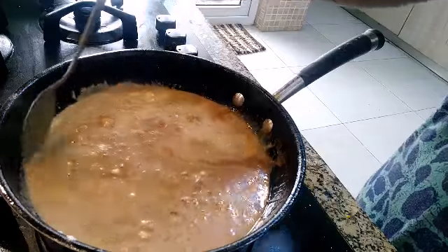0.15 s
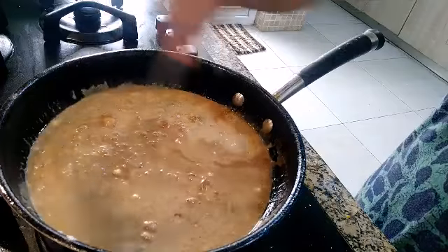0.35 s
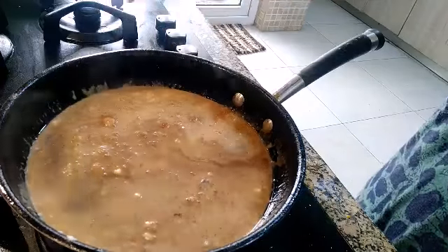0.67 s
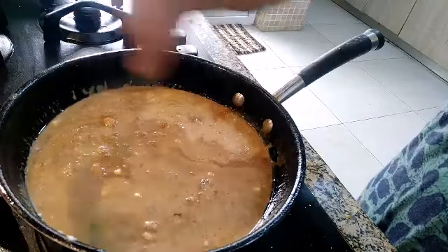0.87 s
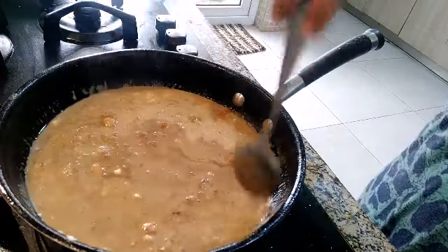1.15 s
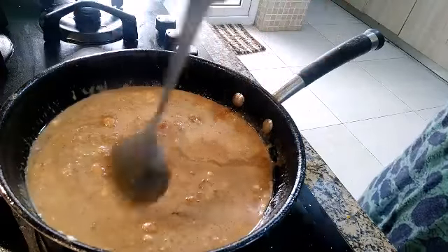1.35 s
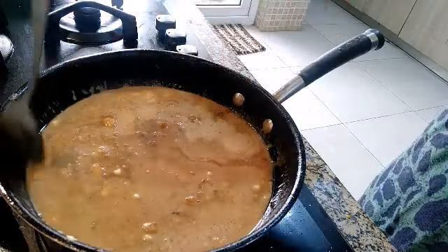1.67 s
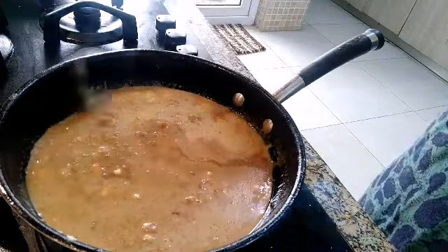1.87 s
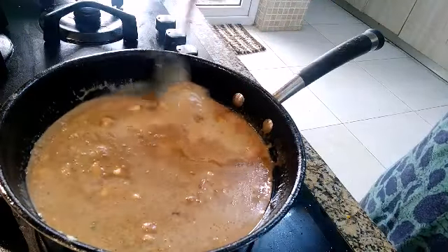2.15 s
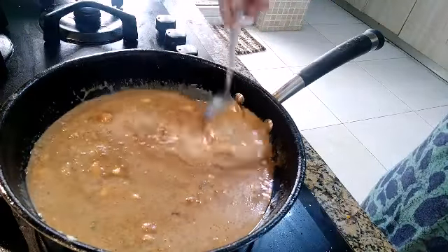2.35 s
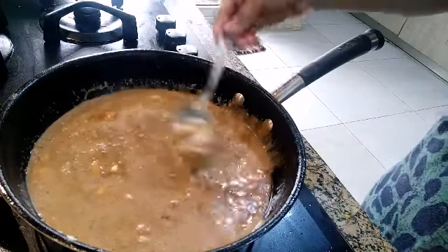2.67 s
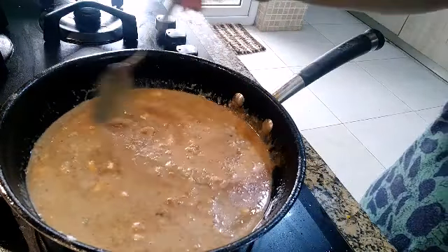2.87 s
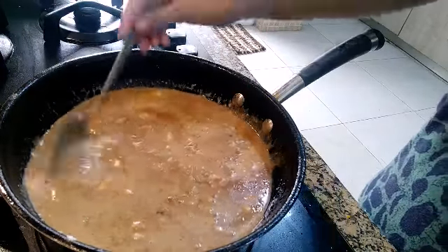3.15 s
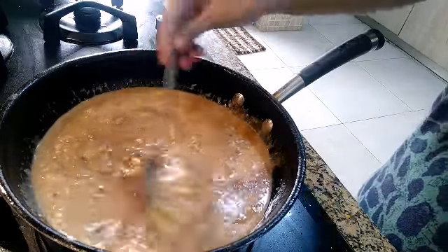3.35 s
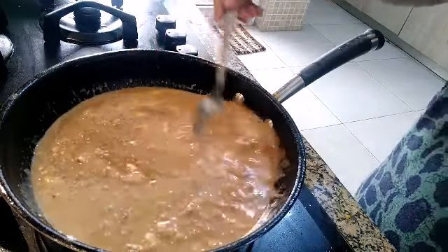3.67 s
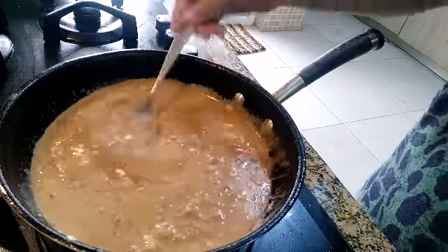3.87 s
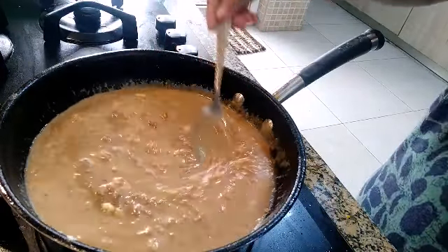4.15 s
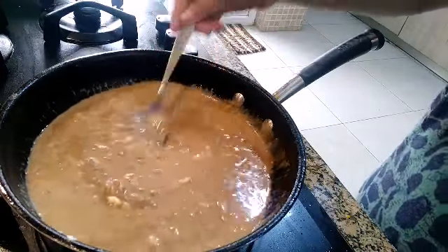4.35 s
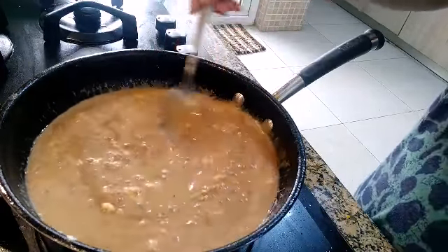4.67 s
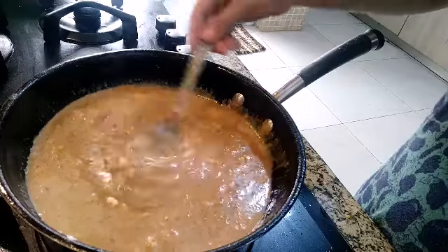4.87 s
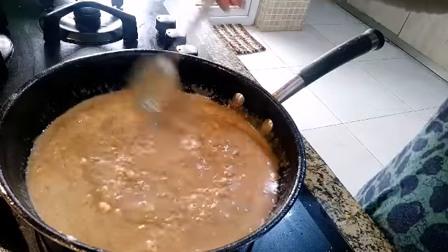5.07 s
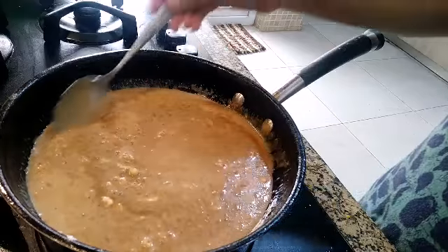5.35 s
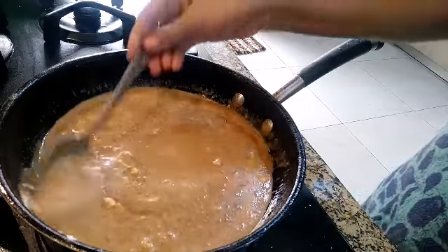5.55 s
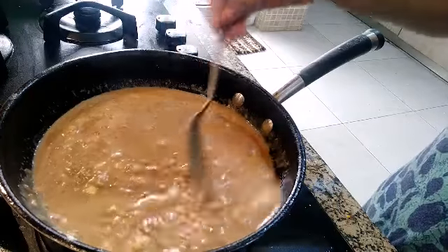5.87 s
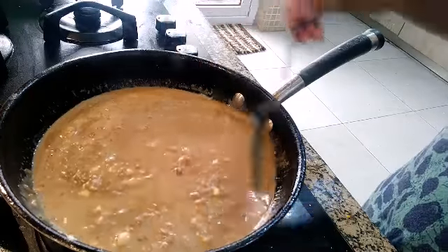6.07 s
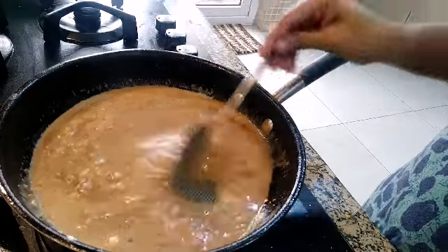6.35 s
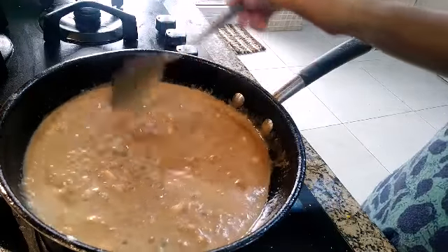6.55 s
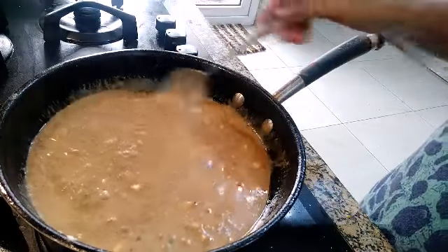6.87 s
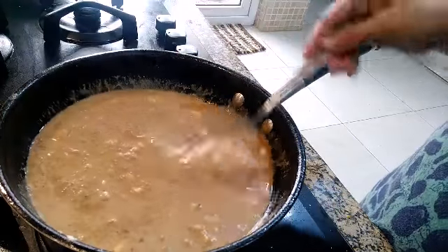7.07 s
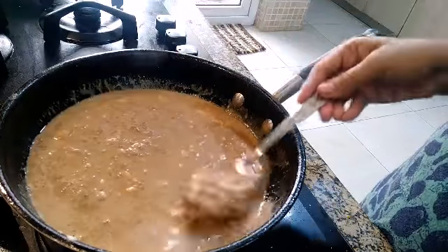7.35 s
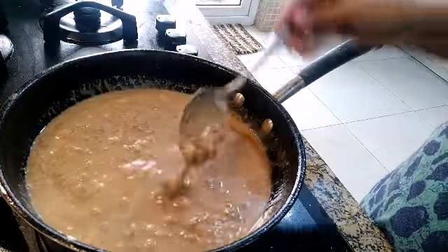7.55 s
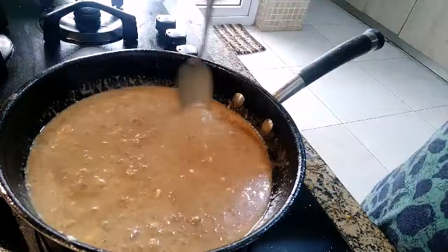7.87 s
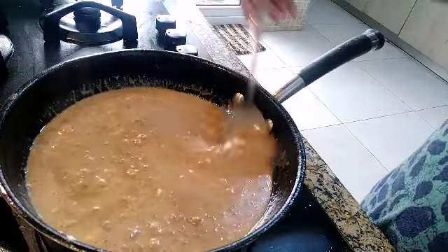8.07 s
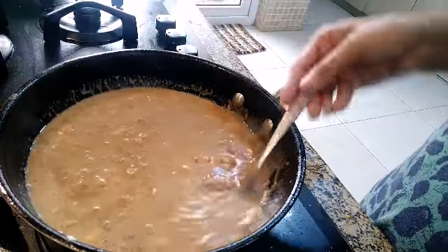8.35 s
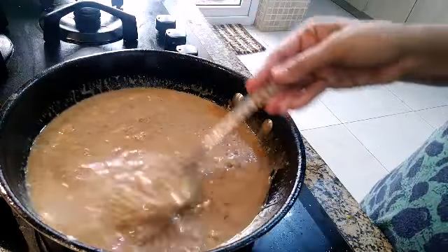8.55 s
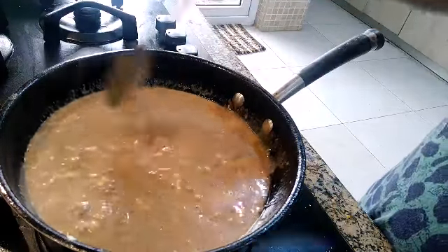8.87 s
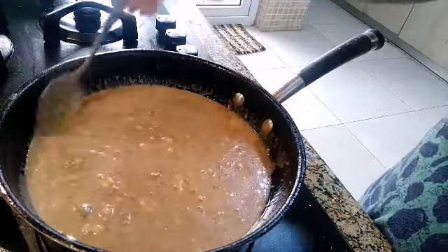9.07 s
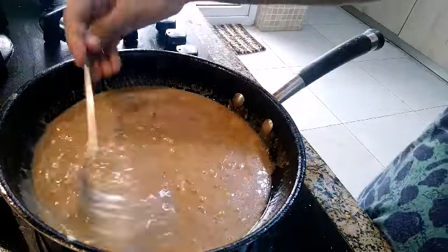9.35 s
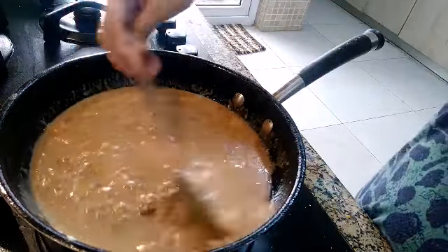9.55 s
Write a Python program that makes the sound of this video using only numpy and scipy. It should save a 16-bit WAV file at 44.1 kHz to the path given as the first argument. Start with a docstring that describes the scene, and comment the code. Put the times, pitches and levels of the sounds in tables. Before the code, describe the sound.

Heard close to the stove in a tiled kitchen, thick sauce sloshes and fizzes as a metal spoon circles a frying pan. The stirring turns into uneven scrapes along the bottom that make the pan ring and the sauce hiss. Scattered clanks and small bubble pops come between the strokes, with two sharper knocks late on, over a steady low hum and a soft gas flame.

```python
"""A steel spoon sweeps thick sauce round the wall of a hot frying pan, and the wet sauce sizzles.
Then it scrapes the bottom in short strokes, its edge catching and slipping so that pan and spoon ring.
Now and then it knocks the pan, or a bubble pops. Underneath lie the gas burner's low rush and a hum.
The place is a tiled kitchen, with a stereo microphone close to the pan on the hob."""
import sys
import numpy as np
from scipy import signal
from scipy.fft import rfft, irfft, next_fast_len
from scipy.io import wavfile
from scipy.ndimage import map_coordinates

SR = 44100
rng = np.random.default_rng(int(sys.argv[2]) if len(sys.argv) > 2 else 0)


def digitize_waveform(pressure):
    """Quantize a signal to 16-bit integers and store it at the path in sys.argv[1].

    Rows of a 2-D input are taken as channels; values are limited to [-1, 1].
    """
    field = np.atleast_2d(pressure).T
    bounded = np.clip(field, -1, 1)
    quanta = np.round(bounded * 32767).astype(np.int16)
    wavfile.write(sys.argv[1], SR, quanta)


N = 428211

# Strokes round the wall: start_s, pressing_s, easing_s, pan_db, grit_db, sizzle_db, slosh_db, centre_hz
SWEEPS = [(.134, 0.0092, 0.23, -48, -60.5, -67, -54.5, 810), (.31, 0.081, 0.15, -41, -60, -40, -40.5, 494),
          (.86, 0.075, 0.074, -44.5, -60.5, -39.5, -47, 447),
          (.94, 0.025, 0.22, -41, -71, -43.5, -39.5, 484), (1.645, 0.078, 0.12, -36, -49.5, -40, -45, 540),
          (1.82, 0.078, .14, -37, -51.5, -46.5, -46, 620), (1.98, 0.1, 0.24, -36.5, -47.5, -45.5, -41, 740),
          (2.17, 0.057, 0.23, -47, -48.5, -43.5, -64, 870)]
# Strokes on the bottom: start_s, pressing_s, easing_s, pan_db, grit_db, sizzle_db, hollow_db, centre_hz
SCRAPES = [(3.054, .37, .11, -49.5, -44, -44, -45, 766),
           (3.854, 0.0055, 0.21, -48, -52.5, -54.5, -54.5, 916),
           (3.94, 0.091, 0.037, -48, -54, -59, -46.5, 760), (4.3, 0.05, 0.39, -51, -60.5, -59, -50.5, 1255),
           (4.585, 0.049, 0.17, -48, -50.5, -48, -45, 1219),
           (4.76, 0.03, 0.21, -45.5, -53.5, -49, -50, 1250),
           (5.495, 0.12, 0.16, -49.5, -48, -49.5, -50.5, 601), (6.20, 0.03, 0.1, -48, -58, -68, -53, 986),
           (6.305, 0.076, 0.088, -36, -41.5, -44.5, -50, 1130),
           (6.82, 0.22, 0.2, -42, -45, -45.5, -44.5, 943), (7.925, 0.18, .06, -69, -43, -44, -49.5, 1202),
           (8.12, 0.032, 0.26, -42, -46.5, -48, -66, 700), (9.151, 0.11, 0.29, -44, -48, -50, -46, 610),
           (9.44, 0.19, 0.28, -50.5, -54.5, -52, -60, 640)]
# A sweep glides in through the sauce, a scrape lands at once: touch_s, swell_db, focus_db_per_octave
SWEEP_MANNER = (0.016, 13, 14.4)
SCRAPE_MANNER = (0.003, 10, 12)
# The hollow ring changes as the spoon's bowl tilts and travels: time_s, pitch_hz
HOLLOW_PITCH = [(3.099, 715), (3.401, 772), (3.998, 720.6), (4.351, 1075), (4.46, 767.2), (4.77, 770),
                (4.81, 1078), (4.871, 750), (5.601, 650), (6.38, 900), (6.902, 723), (7.299, 784),
                (8.061, 952), (9.3, 727.4), (9.39, 645)]
# Fine sizzle, highest while sauce swept up the wall dries: time_s, level_db
SIMMER = [(0, -61), (.5, -54.5), (.8, -52), (1.2, -65), (1.55, -57.5), (1.8, -53), (2.45, -50.5),
          (3.02, -57), (3.75, -65.5), (5.3, -68.5), (6.7, -70.5), (7.5, -65), (8.6, -72), (9.7, -71)]
# The spoon hits the pan: start_s, crack_db, spoon_db, pan_db, thump_db, centre_hz
KNOCKS = [(0.806, -38, -46, -38.5, -35.5, 776), (2.391, -75, -82, -39.5, -53, 438),
          (3.058, -44.5, -45, -37.5, -76, 1860), (3.3182, -41, -48, -39, -45, 483),
          (3.4303, -51, -30, -70, -66, 1800), (5.4958, -40.5, -43, -47.5, -52, 650),
          (6.1987, -35.5, -40, -33, -35.5, 990), (6.241, -48, -40, -40.5, -43, 1080),
          (7.265, -68, -54, -40, -49, 363), (7.9249, -31.5, -28, -32, -37.5, 1080),
          (8.1135, -26, -25, -31.5, -39.5, 610)]
# Bubbles burst: start_s, level_db
POPS = [(5.129, -45), (5.385, -45.5), (7.323, -44), (7.629, -41), (7.797, -49)]
# Resonances of the metal: pitch_hz, width_hz, level_db
PAN_MODES = [(290.6, 13, 2.5), (347, 26, 5), (404, 16, 0), (549, 14, -1.5), (635.3, 25, 8),
             (723.5, 23.5, 5.5), (953, 50, 4.5), (1068.6, 27, 7), (1164, 36, 3.5), (1326, 170, 12),
             (1829, 66, 9)]
SPOON_MODES = [(1790, 98, -13.5), (2786, 82, -0.5), (3095, 83, -1), (4640, 28, -8), (5080, 35, -33)]
# Spectral shapes: frequency_hz, level_db
RUB_SPECTRUM = [(180, -32), (340, 25), (510, 13.5), (680, 22.5), (1550, 13.5), (2400, -38)]  # the rubbed body of the pan
GRIT_SPECTRUM = [(900, -33), (1500, 9), (3000, 15.5), (5200, 6.5), (7500, -10), (9300, -9), (16000, -18)]  # the spoon's edge on the metal
SIZZLE_SPECTRUM = [(2000, -21.5), (4000, -1), (5100, 5), (6300, -1), (7900, -3), (9300, -24.5),
                   (11000, -9.5), (13600, -1.5), (16000, -6)]  # boiling sauce
DRYING_TILT = [(6000, -1), (13000, 5.5)]  # a drying film fizzes more finely
CRACK_SPECTRUM = [(300, 0.5), (1200, 19), (2800, 13), (5400, 14.5), (9300, 4), (13500, 12.5), (16000, 1)]  # the onset of a knock or pop
BURNER_SPECTRUM = [(28, 3.5), (45, -8.5), (160, -2.5), (220, -9), (700, -19.5), (1050, -22), (1600, -39),
                   (15500, -125)]  # the gas flame
# Tones of the hum in the room: pitch_hz, level_db
HUM_TONES = [(48, -58.5), (98, -59.5), (174.5, -52.5)]
# Reverberation of the tiled kitchen: frequency_hz, t60_s
KITCHEN_DECAY = [(150, 0.75), (3000, 0.75), (14000, 0.37)]
# Likeness of left and right at the microphone: frequency_hz, correlation
STEREO_LIKENESS = [(150, 0.97), (300, 0.87), (700, 0.3), (3000, 0.0091)]
# Balance of the microphone's two ports: frequency_hz, left_over_right_db
PORT_BALANCE = [(200, -0.25), (380, -6.5), (700, 1.5), (4400, -1), (8500, -14), (12000, 4.5), (15000, 25.5)]

EASE_DB, SWELL_SHAPE = 12, 1.18  # drop as the hand eases off; a shape over 1 rounds the swell
PAN_FADE_DB_PER_S, GRIT_FADE_DB_PER_S, SIZZLE_FADE_DB_PER_S = 89, 84, 118.5  # once the spoon lets go
GULP_HZ, GULP_S, GULP_RISE = 330.3, 0.065, 0.17  # typical pitch, life, fractional rise over that life
HOLLOW_WIDTH_HZ = 48
LOW_CUT_HZ, TOP_HZ = 36, 15850


def strokes():
    """The spoon's edge catches and slips, shaking the metal, pushing sauce and smearing it to a boil."""
    pan_gain, grit_gain, sizzle_gain, slosh_gain, hollow_gain, *mode_gains = stroke_gains()
    # fast catches ride on the slower, uneven pressure of the hand
    slips = amp(2.4 * wobble(350) + 2.2 * np.tanh(wobble(35)))
    snags = amp(-4) * grains(rate=130, spread_db=1)
    metal = pan_gain * pan_body(slips, snags, mode_gains) + grit_gain * spoon_edge(slips, snags)
    boil = sizzle(sizzle_gain)
    return metal + slosh_gain * slosh() + hollow_gain * hollow_ring() + amp(5.5) * boil


def stroke_gains():
    """Gain curves of pan, grit, sizzle, slosh and hollow ring, then of each pan mode."""
    t = np.arange(0, N / SR, .001)
    pan, grit, boil, push, press = np.zeros((5, len(t)))  # overlapping strokes add in power
    spots = []
    for table, manner, bowl in (SWEEPS, SWEEP_MANNER, push), (SCRAPES, SCRAPE_MANNER, press):
        touch_s, swell_db, focus = manner
        for start_s, pressing_s, easing_s, pan_db, grit_db, sizzle_db, bowl_db, centre_hz in table:
            shape = np.maximum(t - start_s, 0), pressing_s, easing_s, touch_s, swell_db
            pan += (amp(pan_db) * pressure(*shape, PAN_FADE_DB_PER_S)) ** 2
            bowl += (amp(bowl_db) * pressure(*shape, PAN_FADE_DB_PER_S)) ** 2
            grit += (amp(grit_db) * pressure(*shape, GRIT_FADE_DB_PER_S)) ** 2
            boil += (amp(sizzle_db) * pressure(*shape, SIZZLE_FADE_DB_PER_S)) ** 2
            spots.append((start_s + pressing_s, centre_hz, focus))
    peaks_s, centres_hz, focuses = np.transpose(spots)
    mode_gains = favoured_modes(np.interp(t, peaks_s, centres_hz), np.interp(t, peaks_s, focuses))
    curves = [*np.sqrt([pan, grit, boil, push, press]), *mode_gains]
    return [np.interp(np.arange(N) / SR, t, curve) for curve in curves]


def pressure(t, pressing_s, easing_s, touch_s, swell_db, fade_db_per_s):
    """Gain of one stroke: the spoon takes hold, presses harder, eases off and lets go."""
    swell = swell_db * np.maximum(1 - t / pressing_s, 0) ** SWELL_SHAPE
    ease = EASE_DB * np.clip((t - pressing_s) / easing_s, 0, 1) ** 2
    release = fade_db_per_s * np.maximum(t - pressing_s - easing_s, 0)
    return np.minimum(t / touch_s, 1) * amp(-swell - ease - release)


def pan_body(slips, snags, mode_gains):
    """Friction and the jolts of the snagging edge ring the pan's modes over a broad rubbing noise."""
    shake = noise() * slips + snags
    ring = sum((-1) ** k * mode_gains[k] * resonated(shake, [mode]) for k, mode in enumerate(PAN_MODES))
    rub = coloured(noise() * slips, RUB_SPECTRUM)
    rub = shifting_modes(rub, spacing_hz=90, rate=12, depth_db=15, glide_hz=40)
    return ring + amp(-8) * rub


def spoon_edge(slips, snags):
    """Snags make the rubbing gritty, while friction rings the spoon faintly."""
    grit = coloured(noise() * slips + .5 * snags, GRIT_SPECTRUM)
    edge = amp(3.5) * grit + amp(-16) * resonated(noise() * slips, SPOON_MODES)
    edge = shifting_modes(edge, spacing_hz=100, rate=15, depth_db=13, glide_hz=70)
    edge = shifting_modes(edge, spacing_hz=330, rate=15, depth_db=4, glide_hz=200)
    flutter = unit(amp(3 * np.tanh(wobble(110))))
    return edge * flutter


def favoured_modes(centre_hz, focus_db_per_octave):
    """Gain of each pan mode: the spot that is touched favours those near one pitch."""
    gains = np.array([amp(db - focus_db_per_octave * abs(np.log2(hz / centre_hz)))
                      for hz, _, db in PAN_MODES])
    return gains / np.linalg.norm(gains, axis=0)


def shifting_modes(x, spacing_hz, rate, depth_db, glide_hz):
    """As the contact point travels, the pan's close-set modes take turns and their pattern slides."""
    hz, t, spectra = signal.stft(x, SR, nperseg=2048)
    slide_hz = glide_hz * np.interp(t * SR, np.arange(N), wobble(3))
    where = np.broadcast_arrays((hz[:, None] + slide_hz) / spacing_hz, t * rate)
    pattern = map_coordinates(rng.standard_normal((512, 256)), where, order=2, mode="mirror")
    gain = amp(depth_db * np.tanh(pattern) / (1 + hz[:, None] / 12000))
    gain /= np.sqrt(np.mean(gain ** 2, axis=1, keepdims=True))
    return signal.istft(spectra * gain, SR, nperseg=2048)[1][:, :N]


def hollow_ring():
    """The spoon's bowl, pressed on the bottom, keeps one resonance singing, then hops to another."""
    times_s, pitches_hz = np.transpose(HOLLOW_PITCH)
    nearest = np.searchsorted((times_s[1:] + times_s[:-1]) / 2, np.arange(N) / SR)
    hz = pitches_hz[nearest] * (1 + .03 * wobble(16))
    drive = filtered(rng.standard_normal((2, 2, N)), lambda f: 1 / (1 + (f / HOLLOW_WIDTH_HZ) ** 2))
    drive /= np.sqrt(np.hypot(*drive))  # keep the hollow ring's loudness even
    phase = 2 * np.pi * np.cumsum(hz) / SR
    mid, side = drive[0] * np.cos(phase) + drive[1] * np.sin(phase)
    return unit(mid + amp(-7) * np.array([side, -side]))


def sizzle(stroke_gain):
    """Freshly smeared sauce sizzles with each stroke; the drying film fizzes on in between."""
    fresh = boiling(rate=2900, hiss_db=-1)
    fresh = shifting_modes(fresh, spacing_hz=170, rate=13, depth_db=12, glide_hz=90)
    drying = coloured(boiling(rate=1500, hiss_db=-3), DRYING_TILT)
    simmer_gain = amp(np.interp(np.arange(N) / SR, *np.transpose(SIMMER)))
    return stroke_gain * fresh + simmer_gain * drying


def boiling(rate, hiss_db):
    """Sauce on hot metal boils in a mass of minute bubbles."""
    bubbles = grains(rate, spread_db=1.3) + amp(hiss_db) * noise()
    return coloured(bubbles, SIZZLE_SPECTRUM) * amp(1.9 * wobble(26))


def slosh(count=1800):
    """Air folded into thick sauce makes a crowd of low gulps, each rising in pitch and sounding the pan."""
    gulps, t = np.zeros((2, N)), np.arange(SR // 8) / SR
    attack = 1 - np.exp(-t / 0.0045)
    starts_s = rng.uniform(0, N / SR, count)
    for start_s, (pitch, size, lag) in zip(starts_s, rng.standard_normal((count, 3))):
        phase = 2 * np.pi * GULP_HZ * 2 ** (pitch / 4) * (t + GULP_RISE * t * t / (2 * GULP_S))
        tone = np.sin(phase + 0.44 * lag * np.array([[1], [-1]]))
        add(gulps, start_s, attack * amp(2 * size - 30 * t / GULP_S) * tone)
    return unit(.5 * unit(gulps) + resonated(gulps, PAN_MODES))


def knocks():
    """Each blow cracks, rings spoon and pan, and bumps the pan on its grate."""
    out, t = np.zeros((2, N)), np.arange(SR // 3) / SR

    def ring(hz, width_hz):
        lag = rng.normal(0, min(hz / 2000, 1), (2, 1))  # high modes reach the ports out of step
        return np.exp(-np.pi * width_hz * t) * np.sin(2 * np.pi * hz * t + lag)

    burst = decay(t, .04) + amp(-18) * decay(t, .15)
    for start_s, crack_db, spoon_db, pan_db, thump_db, centre_hz in KNOCKS:
        crack = amp(crack_db + 5.5) * coloured(noise(len(t)), CRACK_SPECTRUM) * burst
        spoon = amp(spoon_db) * sum(amp(db) * ring(hz, width) for hz, width, db in SPOON_MODES)
        gains = favoured_modes(centre_hz, focus_db_per_octave=14)
        pan = amp(pan_db + 6) * sum(g * ring(hz, width) for g, (hz, width, _) in zip(gains, PAN_MODES))
        thump = amp(thump_db + 13.5) * (ring(130, 47) + 0.46 * ring(334, 50))
        thump *= 1 - np.exp(-t / 0.00133)
        add(out, start_s, crack + spoon + pan + thump)
    return out


def pops():
    """A bursting bubble gives a short tick and spits a little steam."""
    out, t = np.zeros((2, N)), np.arange(SR // 10) / SR
    puff = (1 - np.exp(-t / .002)) * decay(t, .08)
    for start_s, level_db in POPS:
        tick = amp(-3) * decay(t, .014) * coloured(noise(len(t)), CRACK_SPECTRUM)
        steam = puff * coloured(coloured(noise(len(t)), SIZZLE_SPECTRUM), DRYING_TILT)
        add(out, start_s, amp(level_db) * (tick + steam))
    return out


def kitchen_tail(x):
    """The tiles return a diffuse tail that dies sooner in the high treble."""
    hz, t, spectra = signal.stft(noise(SR // 2), SR, nperseg=256)
    spectra *= decay(t, along(KITCHEN_DECAY, hz)[:, None])
    tail = signal.istft(spectra, SR, nperseg=256)[1]
    return signal.fftconvolve(x, tail / np.linalg.norm(tail[0]), axes=1)[:, :N]


def burner():
    """The gas flame rushes softly under the pan."""
    return amp(-45) * coloured(noise(), BURNER_SPECTRUM)


def room_hum():
    """Room tone: a rough low drone and a wavering hum."""
    t = np.arange(N) / SR
    drone = amp(-50) * resonated(noise(), [(149.4, 6.6, 0)])
    hum = sum(amp(db + 2 * wobble(3.1)) * np.sqrt(2) * np.sin(2 * np.pi * hz * t + .8 * wobble(4.6))
              for hz, db in HUM_TONES)
    return hum + filtered(drone, lambda hz: 1 / (1 + (hz / 300) ** 4))


def noise(size=N):
    """Stereo noise, alike in the bass and unrelated in the treble."""
    def mid_side(hz):
        angle = np.arccos(np.clip(along(STEREO_LIKENESS, hz), -1, 1)) / 2
        return np.array([np.cos(angle), np.sin(angle)])

    mid, side = filtered(rng.standard_normal((2, size)), mid_side)
    return np.array([mid + side, mid - side])


def grains(rate, spread_db):
    """Tiny clicks at random moments, about rate a second, of uneven size."""
    size = amp(spread_db * np.minimum(rng.exponential(size=N), 5))
    return unit((rng.random(N) < rate / SR) * size * rng.standard_normal((2, N)))


def wobble(rate):
    """A smooth random curve, rate knots a second."""
    knots = rng.standard_normal(int(N * rate / SR) + 4)
    return map_coordinates(knots, [np.arange(N) * rate / SR], order=2)


def resonated(x, modes):
    """x through resonances of alternating sign, at rms 1."""
    def response(f):
        return sum((-1) ** k * amp(db) * 1j * f * width / (hz * hz - f * f + 1j * f * width)
                   for k, (hz, width, db) in enumerate(modes))

    return unit(filtered(x, response))


def coloured(x, spectrum):
    """x shaped by a spectrum, at rms 1."""
    return unit(filtered(x, lambda hz: amp(along(spectrum, hz))))


def filtered(x, response):
    """x through a frequency response."""
    size = x.shape[-1]
    padded = next_fast_len(size + 8192, True)
    return irfft(rfft(x, padded) * response(np.fft.rfftfreq(padded, 1 / SR)), padded)[..., :size]


def along(points, hz):
    """Interpolate (frequency_hz, value) points on a log axis."""
    frequencies, values = np.transpose(points)
    return np.interp(np.log(hz + 1), np.log(frequencies + 1), values)


def decay(t, t60_s):
    """A gain that falls 60 dB in t60_s."""
    return amp(-60 * t / t60_s)


def amp(db):
    """Decibels to gain."""
    return 10 ** (np.asarray(db) / 20)


def unit(x):
    """Scale to rms 1."""
    return x / np.sqrt(np.mean(x ** 2) + 1e-20)


def add(track, start_s, sound):
    """Mix a sound in at start_s."""
    part = track[:, round(start_s * SR):][:, :sound.shape[-1]]
    part += sound[:, :part.shape[-1]]


def scene():
    """Close at the hob: dry strokes, knocks and pops with the kitchen's tail, burner and hum behind."""
    hits = knocks() + pops()
    return strokes() + hits + amp(-3.5) * kitchen_tail(hits) + burner() + room_hum()


def record(dry):
    """The microphone's two ports colour the sound differently; deep rumble and the top are cut off."""
    def response(hz):
        balance_db = np.array([[-1], [1]]) * along(PORT_BALANCE, hz)
        share = np.sqrt(2 / (1 + amp(2 * balance_db)))
        low_cut = 1 - np.exp(-(hz / LOW_CUT_HZ) ** 2)
        return share * low_cut * (hz < TOP_HZ)

    return filtered(dry, response)


dry = scene()
out = record(dry)
digitize_waveform(out)
```